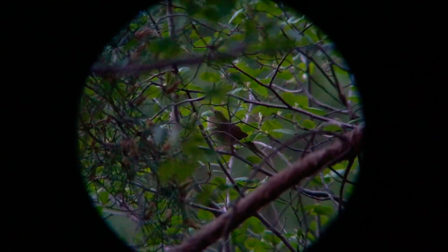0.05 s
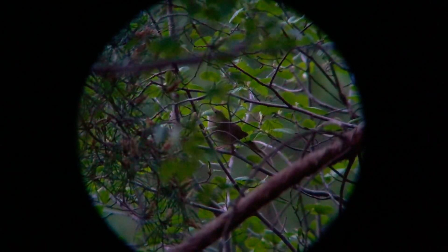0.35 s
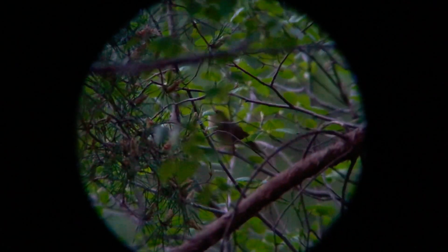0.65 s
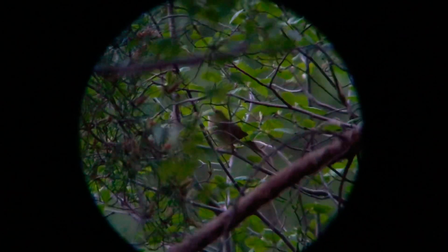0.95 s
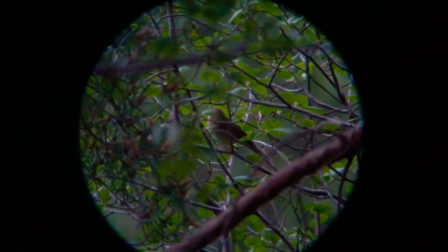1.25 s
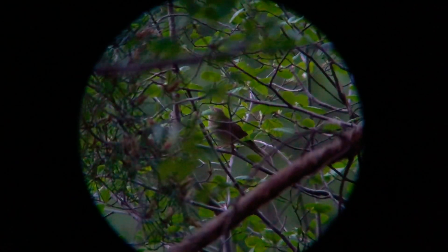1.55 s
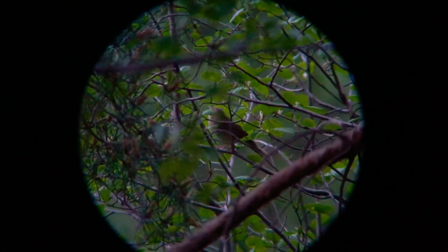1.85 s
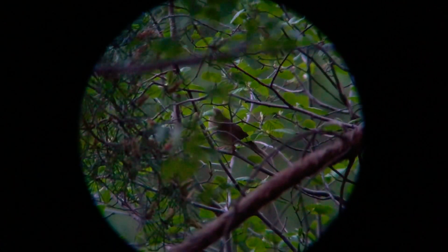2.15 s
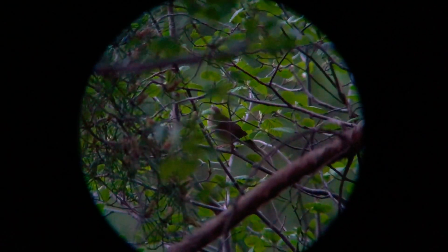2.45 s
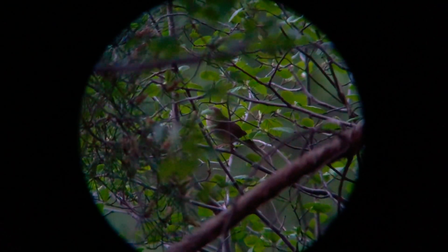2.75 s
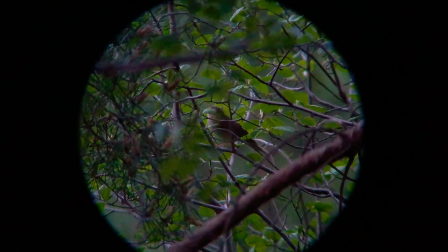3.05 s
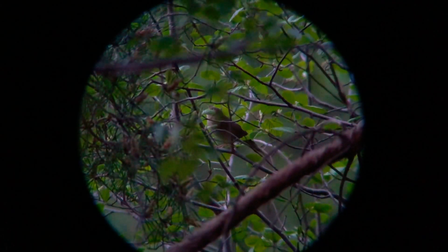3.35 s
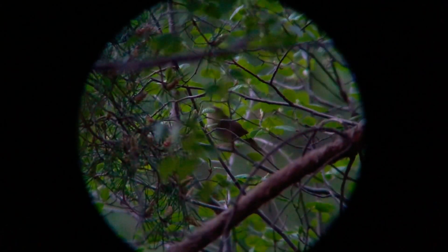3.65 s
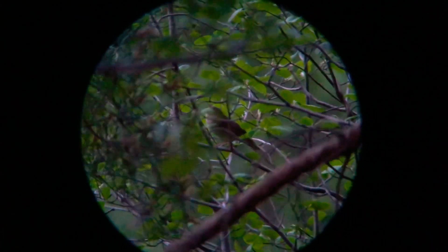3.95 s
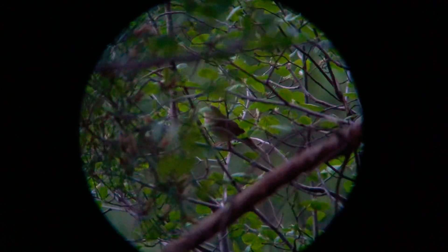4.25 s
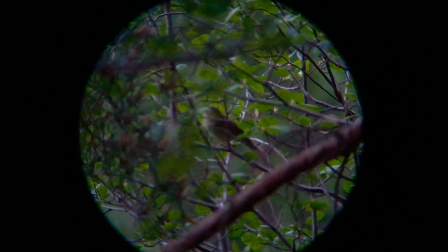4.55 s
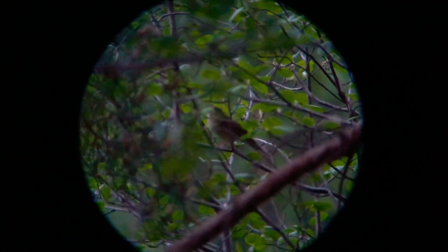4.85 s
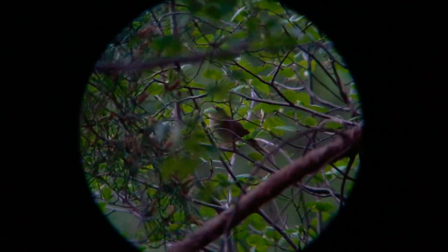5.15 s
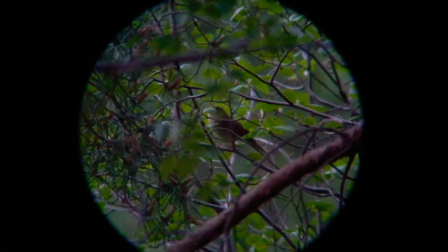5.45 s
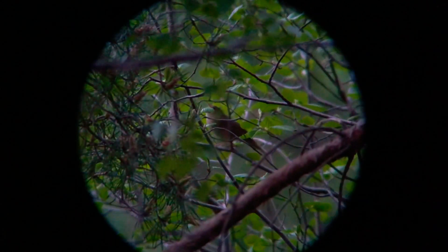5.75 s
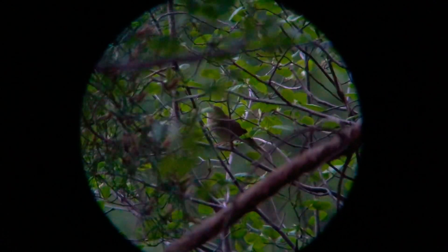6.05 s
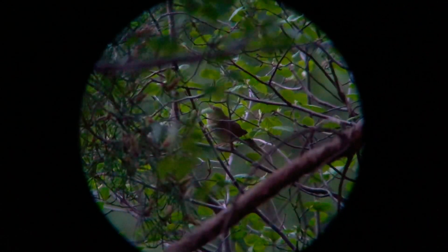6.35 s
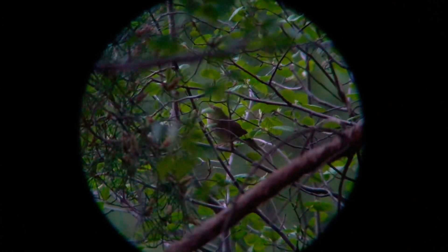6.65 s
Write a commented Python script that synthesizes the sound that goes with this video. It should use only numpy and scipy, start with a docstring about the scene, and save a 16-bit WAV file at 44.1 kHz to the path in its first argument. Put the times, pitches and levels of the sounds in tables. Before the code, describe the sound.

A small songbird sings one continuous, fast, buzzing trill over faint wind in leaves and distant road noise.

```python
"""A warbler's long, dry trill rattles out of a leafy thicket, about seventeen syllables a second.
Each syllable is a buzz of six steep down-sweeps and a short falling whistle, scattered by twigs and
leaves. The whistles lilt up and down nearly five times a second, loudest when lowest.
Behind it a far road rumbles, a car draws nearer on singing tyres, wind stirs the leaves
and another bird whistles faintly, all over a thin bed of microphone hiss."""
import sys
import numpy as np
from scipy import signal
from scipy.fft import rfft, irfft
from scipy.io import wavfile
from scipy.ndimage import uniform_filter1d

SR = 44100
rng = np.random.default_rng(int(sys.argv[2]) if len(sys.argv) > 2 else 0)


def wav_record(signal):
    """Record a signal, one row per channel, as 16-bit PCM in the file named by sys.argv[1]."""
    frames = np.transpose(np.atleast_2d(signal))
    bounded = np.clip(frames, -1, 1)
    # unit amplitude maps onto the largest positive 16-bit level
    quanta = np.round(bounded * 32767).astype(np.int16)
    wavfile.write(sys.argv[1], SR, quanta)


N = 295911
T = np.arange(N) / SR

# EQ curves for the noise beds: frequency_hz, gain_db
MIC_HISS_EQ = [(3000, -7), (7000, 25), (8400, 2), (10000, 4), (12200, -21), (13000, 0), (15000, -3),
               (16000, -25)]
TYRE_ROAR_EQ = [(200, -28.5), (380, -21.5), (470, -15.5), (620, -10), (760, -7), (880, -3), (990, -3),
                (1120, -2.5), (1300, -7.5), (1800, -39), (3000, -74)]
ROAD_HISS_EQ = [(1500, -3), (2000, 4), (2450, 7), (2700, 2), (3000, -2), (3700, -0.5), (4200, -6.5),
                (6000, -3), (8000, -37), (12000, -33)]
ROAD_RUMBLE_EQ = [(22, -63), (33, -34), (43, -8), (50, 3.5), (64, -1.5), (80, -5), (115, -1.5), (160, -7.5),
                  (220, -12), (320, -18), (500, -19), (1200, -49)]
CAR_DRONE_EQ = [(40, -25), (90, -4.5), (150, 0), (210, -3.5), (330, -19.5), (1000, -51)]
WIND_EQ = [(200, -18.5), (400, -13), (700, -7.5), (1100, -8), (1400, 0.5), (1750, -1.5), (2150, -3.5),
           (2550, -8), (2800, -18.5), (3100, -25.5), (3600, -40.5), (5000, -55)]
RUSTLE_EQ = [(1500, -24), (2200, -1.5), (2600, -0.5), (2800, -7), (3100, -19), (4000, -32), (6000, -50)]
# the tread's singing band within the tyre roar: time_s, centre_hz, level_db
TREAD_BAND = [(0, 992, -65), (2, 976.6, -58.5), (3.801, 998.5, -60.5), (4.05, 1034, -48.5),
              (4.25, 1010, -50.5), (4.449, 920, -52), (4.85, 907.6, -50), (5.15, 900.5, -54.5),
              (5.6, 924.5, -50), (5.9, 997.3, -46), (6.25, 970, -45.5), (6.55, 979, -45.5),
              (6.71, 979, -48)]
# fader ride for the wind in the leaves: time_s, gain_db
BREEZE_RIDE = [(0.15, -51.5), (0.2, -51), (1.19, -49.5), (1.44, -49), (4.62, -50), (5.4, -48),
               (6.44, -46.5), (6.51, -45.5), (6.6, -46.5)]
# the far bird's whistles: start_s, length_s, start_hz, end_hz, level_db
FAR_WHISTLES = [(.16, .1, 2540, 2330, -61), (.465, .055, 3150, 2750, -63), (.52, .05, 2830, 2880, -63),
                (.56, .06, 3080, 2950, -65), (1.78, .095, 2450, 3020, -62.5), (2.6, .09, 2600, 2460, -58),
                (2.71, .09, 2500, 2550, -60), (4.91, .09, 2640, 2580, -56), (5.18, .065, 3000, 3160, -64),
                (5.335, .105, 2700, 2535, -50), (5.5, .09, 2660, 2590, -60), (5.6, .08, 2560, 2460, -59)]

# early bounces off nearby surfaces and branches: delay_s
BOUNCE_DELAYS = [.000628, .001264, .00262, .00428, .00604, .00675, .0105, .0187]
# strength of each bounce: gain
BOUNCE_GAINS = [0.21, 0.28, 0.3, 0.11, 0.074, 0.19, 0.07, 0.23]
# small leaves throw back the highs best: frequency_hz, gain_db
LEAF_EQ = [(4500, -8), (5600, -7), (6400, -3.5), (7500, -1), (13000, 0)]

# pace of the trill, held until the next row: start_s, syllables_per_s
TRILL_TEMPO = [(-.011, 17.10), (1.158, 16.08), (1.283, 16.71), (1.642, 16.96), (3.175, 17.16),
               (3.758, 17.09), (5.63, 17.24), (6.095, 17.02)]
# the whistles' rise and fall, running free of the syllables: start_s, cycles_per_s
LILT_RATE = [(-.056, 5.05), (.457, 4.6), (1.158, 4.79), (2.94, 4.71), (3.64, 4.43), (4.34, 4.89),
             (5.86, 4.29), (6.21, 4.93)]
# the song falters after a second and recovers: time_s, buzz_gain_db, low_whistle_gain_db, lilt_depth
SONG_EFFORT = [(0, -53, -39, 0.87), (.88, -53, -37.5, 1), (1.12, -53, -39, 1), (1.2, -55.3, -43, .5),
               (1.47, -55.3, -42.5, 0.13), (1.72, -55.5, -45, 0.97), (2.33, -55, -46, 0.75),
               (2.56, -54, -42, 1), (3.1, -54.3, -43.5, 0.98), (3.95, -53.7, -41, 1),
               (4.5, -53.7, -41.5, .9), (4.95, -52.5, -39, 1), (5.9, -52.5, -40, 0.9),
               (6.15, -54, -41, 0.68), (6.7, -54.5, -41, 0.73)]
# six sweeps that grow louder and mostly reach lower: onset_periods, gain_db, lowest_hz
BUZZ_SWEEPS = [(0, -3.5, 4900), (.97, -1, 4550), (1.94, -.3, 4300), (2.91, .5, 4100), (3.9, 1.2, 4000),
               (5, 2.1, 4100)]
# tone of one sweep with its weak octave: frequency_hz, gain_db
SWEEP_EQ = [(3900, -48), (4250, -9), (4500, -5), (4900, -1.5), (5250, -1.5), (5900, 3.5), (6300, 4),
            (6750, -3), (7300, -15.5), (8300, -47), (10200, -33.5), (11300, -25.5), (12200, -27.5),
            (12800, -22.5), (13600, -26.5)]
# fader ride for the buzz's overtone between 9 and 12 kHz: time_s, gain_db
SHEEN_RIDE = [(0, 1), (1.12, 0), (1.22, -6), (2.3, -1), (3, 0), (4.5, 0.5), (6.7, 0)]
# strength of the whistle's octave by where it lands: frequency_hz, gain_db
OCTAVE_EQ = [(12400, -19), (13000, -17.5), (13700, -18), (14400, -15), (15400, -16)]


def undb(db):
    """Decibels to gain."""
    return 10 ** (np.asarray(db) / 20)


def unit(x):
    """Scale to rms 1."""
    return x / np.sqrt(np.mean(x ** 2))


def eq_gain(eq, hz):
    """Gain of an EQ curve at the given frequencies."""
    points_hz, db = np.transpose(eq)
    return undb(np.interp(np.log(np.maximum(hz, 1)), np.log(points_hz), db))


def automation(table, t):
    """A timed table's value columns, interpolated at times t."""
    time_s, *columns = np.transpose(table)
    return [np.interp(t, time_s, column) for column in columns]


def cycles(table):
    """Times and the cycles completed by then, for a table of held rates."""
    time_s, rate = np.transpose(table)
    time_s = np.append(time_s, N / SR)
    return time_s, np.append(0, np.cumsum(np.diff(time_s) * rate))


def add(out, start_s, sound):
    """Mix a sound in at a time."""
    at = int(round(start_s * SR)) + np.arange(len(sound))
    inside = (at >= 0) & (at < len(out))
    out[at[inside]] += sound[inside]


def noise(eq):
    """Noise shaped by an EQ curve, rms 1."""
    return unit(irfft(rfft(rng.standard_normal(N)) * eq_gain(eq, np.fft.rfftfreq(N, 1 / SR)), N))


def drift(rate_hz):
    """Smooth random modulation, rms 1: held steps, slewed twice."""
    hold = int(SR / rate_hz)
    steps = np.repeat(rng.standard_normal(N // hold + 1), hold)
    return unit(uniform_filter1d(uniform_filter1d(steps, hold), hold)[:N])


def reverb(sound, t60_s, rise_s, length_s):
    """The wet signal alone: dense reflections that build up and die away."""
    t = T[:int(length_s * SR)]
    tail = rng.standard_normal(len(t)) * (1 - np.exp(-t / rise_s)) * np.exp(-np.log(1000) * t / t60_s)
    return signal.fftconvolve(sound, tail / np.sqrt(np.sum(tail ** 2)))


def mic_hiss(level_db=-76):
    """The microphone's own thin, bright noise floor."""
    return noise(MIC_HISS_EQ) * undb(level_db)


def far_road(nearest_s=6.25, road_m=27.5, speed_m_s=19.1, trees_db_per_m=.07):
    """A steady traffic bed and one car swelling as it nears; the trees soak up its hiss with distance."""
    distance_m = np.hypot(road_m, speed_m_s * (T - nearest_s))
    car_gain = road_m / distance_m
    trees_db = trees_db_per_m * (distance_m - road_m)
    # in each layer the traffic comes first, then the car
    roar = noise(TYRE_ROAR_EQ) * np.hypot(undb(-52.5), car_gain * undb(-47))
    hiss = noise(ROAD_HISS_EQ) * np.hypot(undb(-77.5), car_gain * undb(-64 - trees_db))
    rumble = noise(ROAD_RUMBLE_EQ) * undb(-54.7) + noise(CAR_DRONE_EQ) * car_gain * undb(-58)
    return roar + hiss + rumble


def tyre_song(width_hz=64):
    """The tread sings in a narrow band that drifts with the road surface."""
    centre_hz, level_db = automation(TREAD_BAND, T)
    window = np.exp(-(np.fft.fftfreq(N, 1 / SR) / (2 * width_hz)) ** 2)
    band = np.fft.ifft((rng.standard_normal(N) + 1j * rng.standard_normal(N)) * window)
    carrier = np.exp(2j * np.pi * np.cumsum(centre_hz) / SR)
    return undb(level_db) * unit(np.real(band * carrier))


def wind(trim_db=.17, flutter_db=.62, rustle_peak_db=-53, rustle_growth=4):
    """A soft wash of wind in the leaves, with a brighter rustle that only a strong gust stirs."""
    breeze_db, = automation(BREEZE_RIDE, T)
    wash = noise(WIND_EQ) * undb(breeze_db + trim_db + flutter_db * drift(rate_hz=6))
    rustle = noise(RUSTLE_EQ) * undb(rustle_peak_db + rustle_growth * (breeze_db - breeze_db.max()))
    return wash + rustle


def far_bird(wet_db=-5, fall_bend=3.2, rise_bend=1.3):
    """Soft whistles blurred by the trees: falling ones level off, rising ones climb more evenly."""
    calls = np.zeros(N)
    for start_s, length_s, start_hz, end_hz, level_db in FAR_WHISTLES:
        progress = np.linspace(0, 1, int(length_s * SR))
        bend = fall_bend if start_hz > end_hz else rise_bend
        pitch_hz = end_hz + (start_hz - end_hz) * (1 - progress) ** bend
        envelope = undb(level_db) * np.sin(np.pi * progress)
        add(calls, start_s, envelope * np.sin(2 * np.pi * np.cumsum(pitch_hz) / SR))
    return calls + undb(wet_db) * reverb(calls, t60_s=.65, rise_s=.024, length_s=1)[:N]


def thicket(song, twigs_db=-14, wood_db=-22):
    """Twigs add a short ring, the wood beyond a faint longer tail; near surfaces comb the whole."""
    twigs = undb(twigs_db) * reverb(song, t60_s=.11, rise_s=.002, length_s=.2)[:N]
    wood = undb(wood_db) * reverb(song, t60_s=.7, rise_s=.037, length_s=1)[:N]
    blend = song + twigs + wood
    combed = blend.copy()
    for delay_s, gain in zip(BOUNCE_DELAYS, BOUNCE_GAINS):
        add(combed, delay_s, gain * blend)
    return combed


def down_sweep(eq_shift, fall_s_per_octave, lowest_hz, sheen_db, linger_s_per_octave=.0045, size=512):
    """One steep chirp, mid-buffer, energy 1: it lingers at the top, then drops, its octave alongside."""
    hz = np.fft.rfftfreq(size, 1 / SR)
    pitch_hz = np.clip(np.where(hz > 9000, hz / 2, hz), 3500, 7800)  # above 9 kHz lies the octave
    # higher pitches arrive earlier, which makes the sweep
    early_s = fall_s_per_octave * np.log2(pitch_hz / 5200)
    early_s += linger_s_per_octave * np.maximum(np.log2(pitch_hz / 6300), 0)
    phase = -2 * np.pi * np.cumsum(size / 2 / SR - early_s) * SR / size
    low_cut = 1 / np.hypot(1, (lowest_hz / np.maximum(hz, 1)) ** 14)
    sheen = undb(sheen_db * ((hz > 9000) & (hz < 12000)))
    chirp = irfft(eq_gain(SWEEP_EQ, hz / eq_shift) * low_cut * sheen * np.exp(1j * phase))
    return chirp / np.sqrt(np.sum(chirp ** 2))


def whistle(pitch_hz, level_db, effort_db, width_s=.0021, slur=.04016):
    """A pip that slurs down and levels off, quavering more when high; a faint octave colours its start."""
    t = (T[:1024] - T[512]) / width_s  # in widths from the peak
    fall = (np.logaddexp(0, -2 * t) - np.log(2)) / 2
    shake = unit(uniform_filter1d(rng.standard_normal(len(t)), size=36))
    quaver = .016 * (pitch_hz / 6300) ** 5 * shake
    phase = 2 * np.pi * np.cumsum(pitch_hz * (1 + slur * fall + quaver)) / SR
    tone = np.exp(-t ** 2 / 2) * undb(level_db) * np.sin(phase)
    octave = np.exp(-(t + 1) ** 2 / 4) * undb(effort_db) * np.sin(2 * phase)
    return tone + octave * eq_gain(OCTAVE_EQ, 2 * pitch_hz)


def phrasing(low_hz=6400, rest_hz=6910, high_hz=7720, dwell=1.65, fade_db_per_khz=17):
    """A cue for each syllable: the lilt steers its buzz rate and its whistle's pitch and level."""
    time_s, count = cycles(TRILL_TEMPO)
    beat_s = np.interp(np.arange(np.ceil(count[-1])), count, time_s)
    lilt = np.cos(2 * np.pi * np.interp(beat_s, *cycles(LILT_RATE)))
    effort_db, low_whistle_db, depth = automation(SONG_EFFORT, beat_s)
    late, quick, sharp, stray_db = rng.standard_normal((len(beat_s), 4)).T
    buzz_rate_hz = 269 + 8 * lilt + 4 * quick
    aim_hz = low_hz + (high_hz - low_hz) * ((1 + lilt) / 2) ** dwell  # dwells at the bottom
    whistle_hz = rest_hz + depth * (aim_hz - rest_hz) + 70 * sharp
    above_khz = np.maximum(whistle_hz - low_hz, 0) / 1000
    whistle_db = low_whistle_db - fade_db_per_khz * above_khz + stray_db
    return zip(beat_s + .0008 * late, buzz_rate_hz, effort_db, whistle_hz, whistle_db)


def warbler(buzz_trim_db=20, whistle_trim_db=-3, gap_s=.0106, uneven_db=1.5, preroll_s=.02):
    """Buzz, then whistle, over and over; the head moves, so the leaves scatter each syllable anew."""
    direct, leaves = np.zeros(N), np.zeros(N)
    for start_s, buzz_rate_hz, effort_db, whistle_hz, whistle_db in phrasing():
        syllable = np.zeros(4096)
        sheen_db, = automation(SHEEN_RIDE, start_s)
        for onset_periods, step_db, lowest_hz in BUZZ_SWEEPS:
            bright, slow, loud = rng.standard_normal(3)
            chirp = down_sweep(1 + .024 * bright, .000893 * np.exp(.2 * slow), lowest_hz, sheen_db)
            chirp *= undb(buzz_trim_db + effort_db + step_db + uneven_db * loud)
            chirp_s = preroll_s + onset_periods / buzz_rate_hz
            add(syllable, chirp_s - len(chirp) / 2 / SR, chirp)
        pip = whistle(whistle_hz, whistle_db + whistle_trim_db, effort_db)
        add(syllable, chirp_s + gap_s - len(pip) / 2 / SR, pip)  # follows the last sweep
        add(direct, start_s - preroll_s, syllable)
        add(leaves, start_s - preroll_s, reverb(syllable, t60_s=.15, rise_s=.0029, length_s=.2))
    return direct + irfft(rfft(leaves) * eq_gain(LEAF_EQ, np.fft.rfftfreq(N, 1 / SR)), N)


def scene():
    """The mono mix: the warbler up front in its thicket, the distant beds behind."""
    return (thicket(warbler()) + far_bird() + far_road() + wind() + mic_hiss() + tyre_song())[None]


def record(dry):
    """A steep low-pass trims the air above 15.65 kHz."""
    return signal.sosfilt(signal.ellip(10, .2, 70, 15650, fs=SR, output="sos"), dry)


dry = scene()
out = record(dry)
wav_record(out)
```